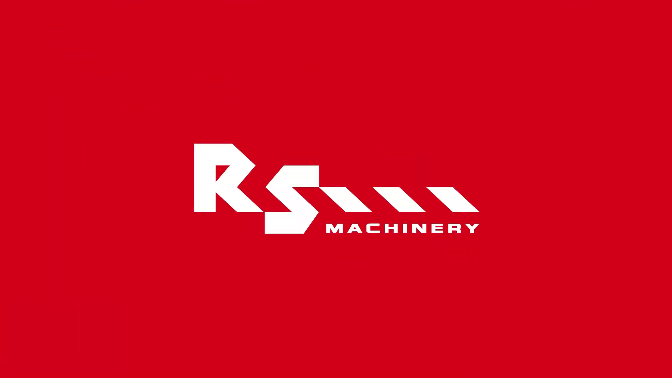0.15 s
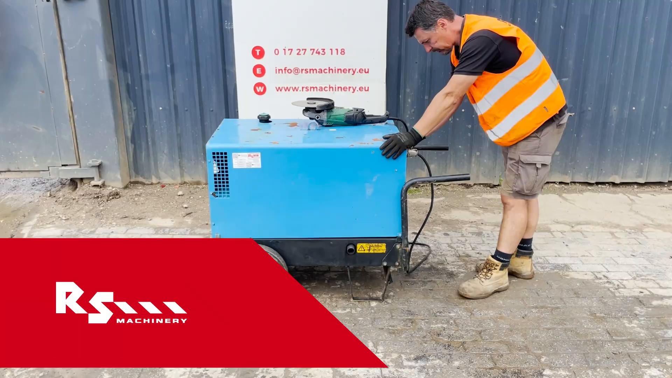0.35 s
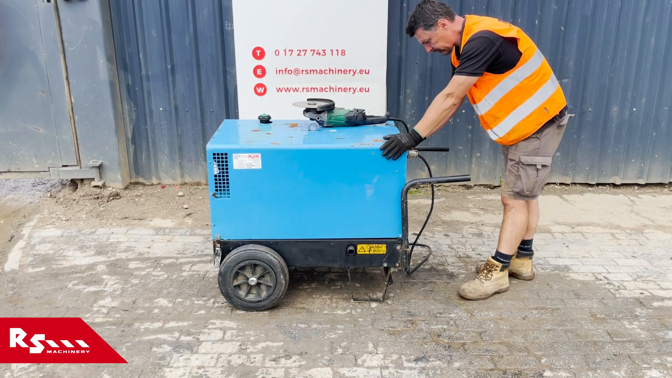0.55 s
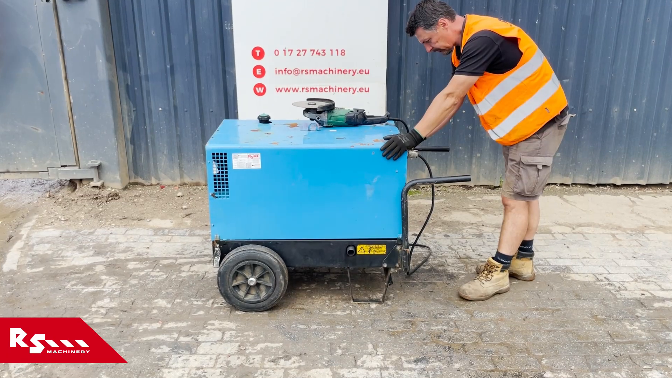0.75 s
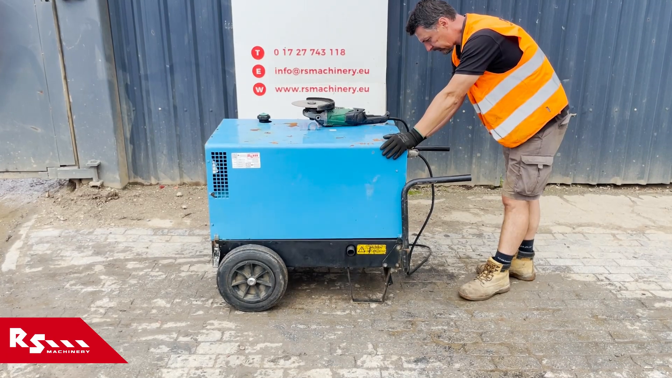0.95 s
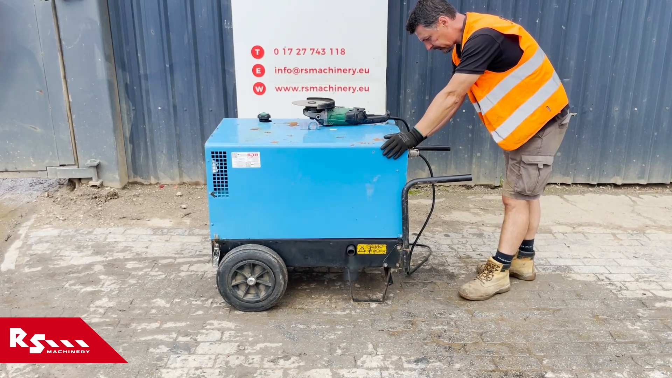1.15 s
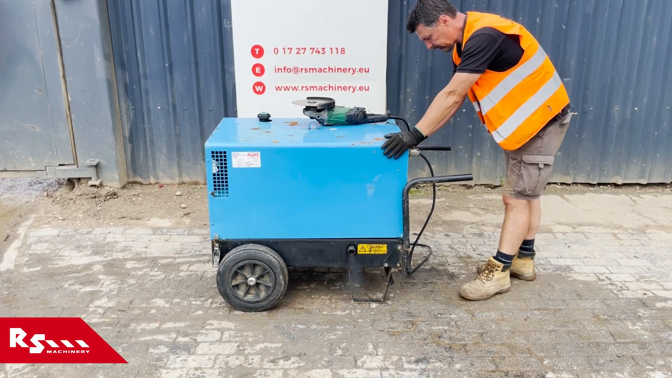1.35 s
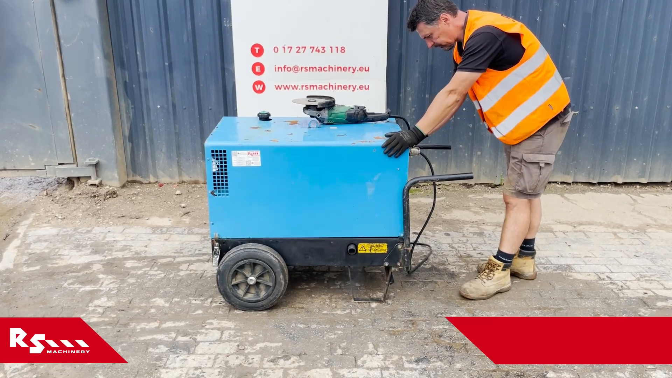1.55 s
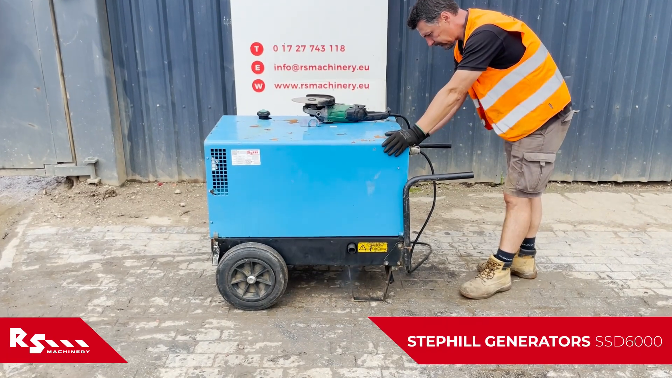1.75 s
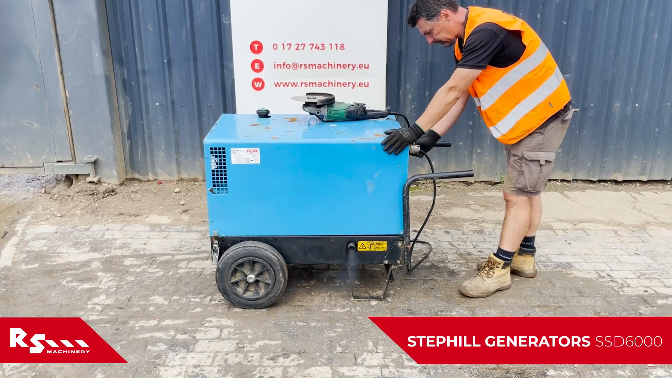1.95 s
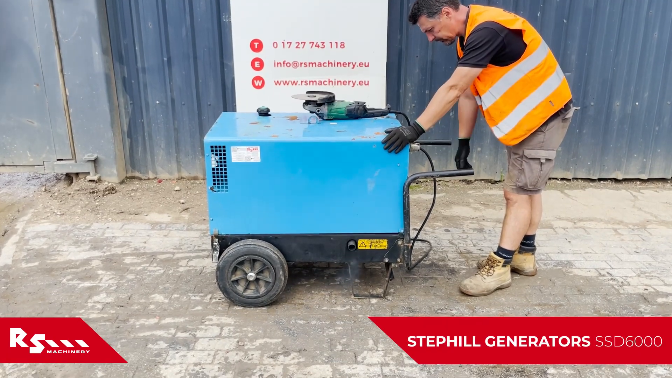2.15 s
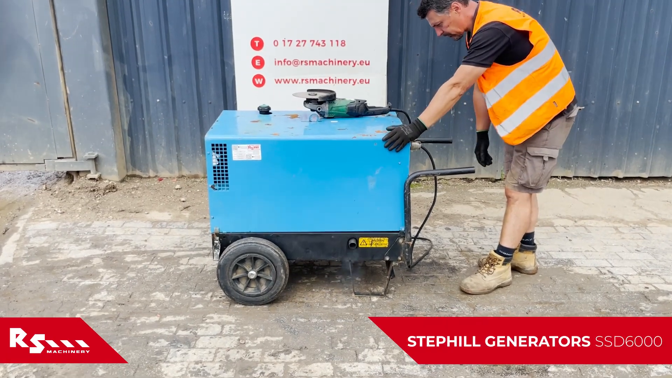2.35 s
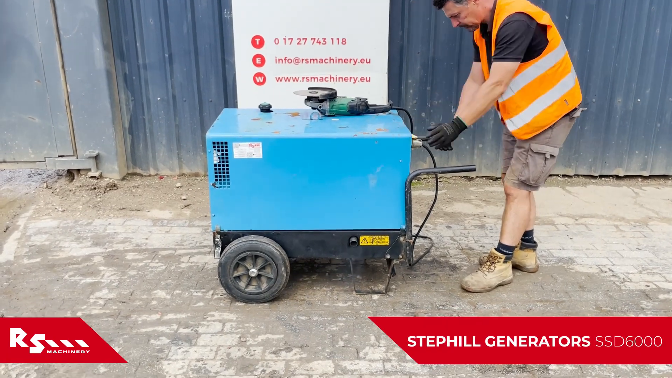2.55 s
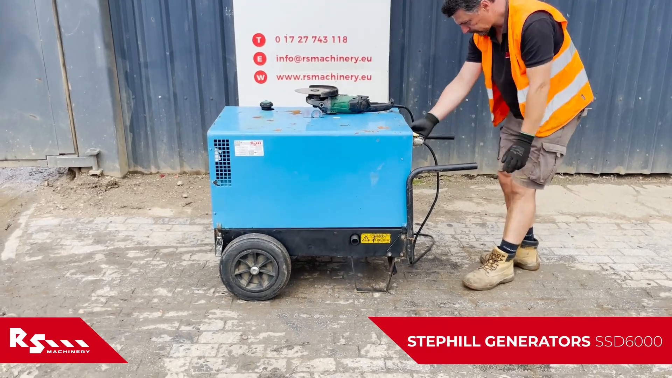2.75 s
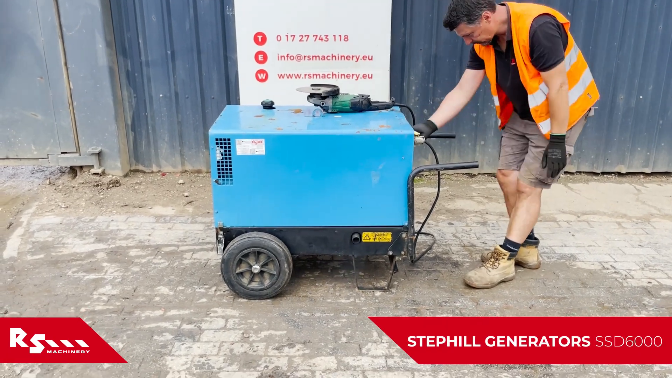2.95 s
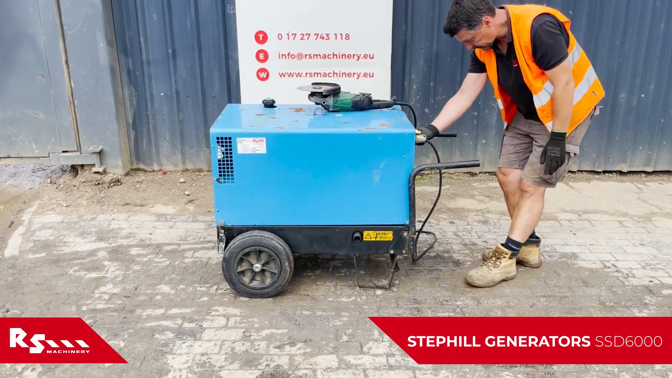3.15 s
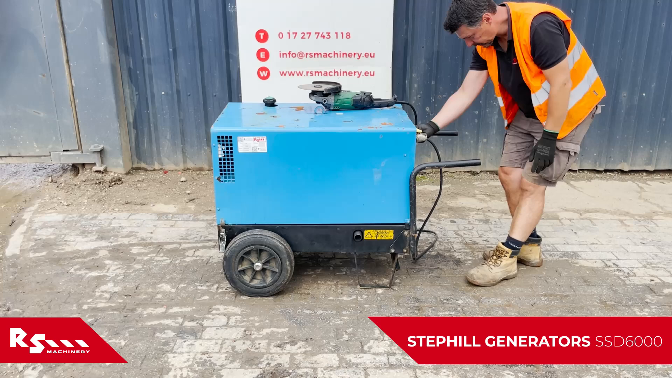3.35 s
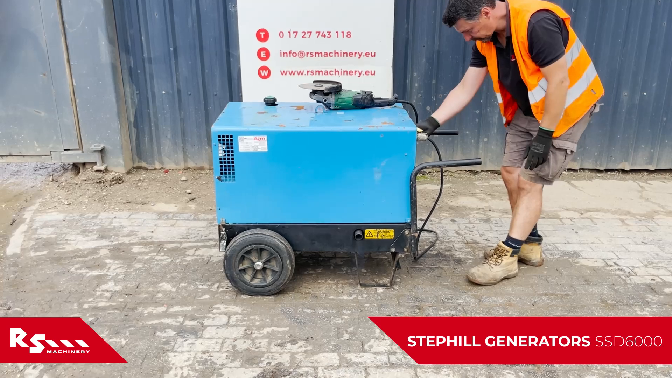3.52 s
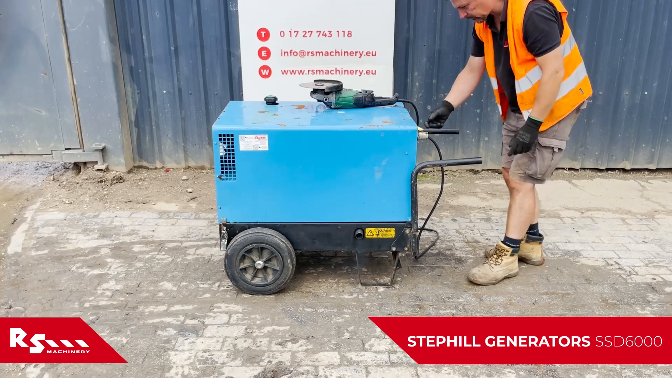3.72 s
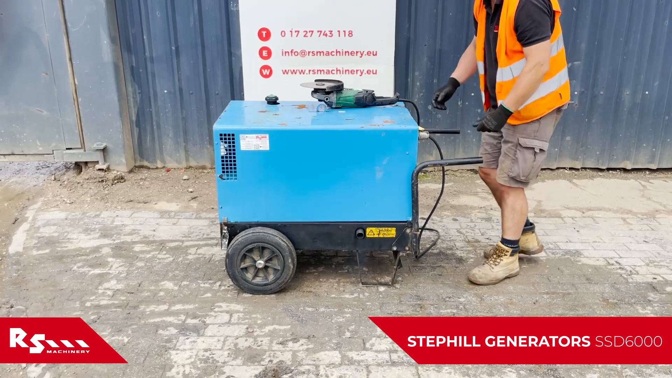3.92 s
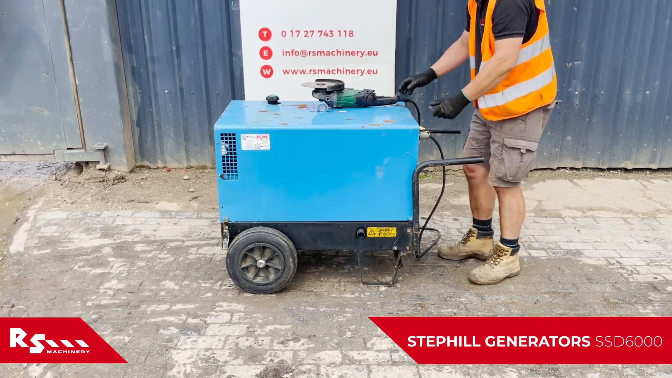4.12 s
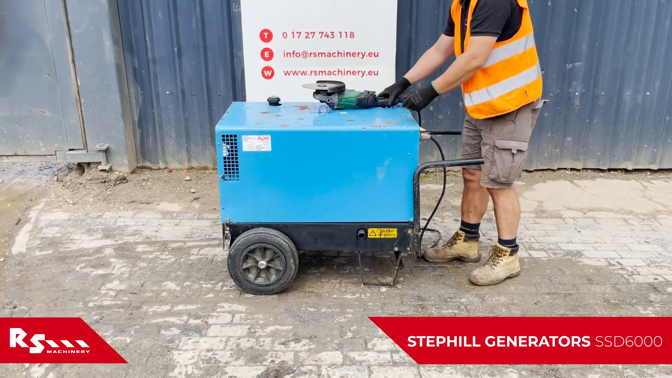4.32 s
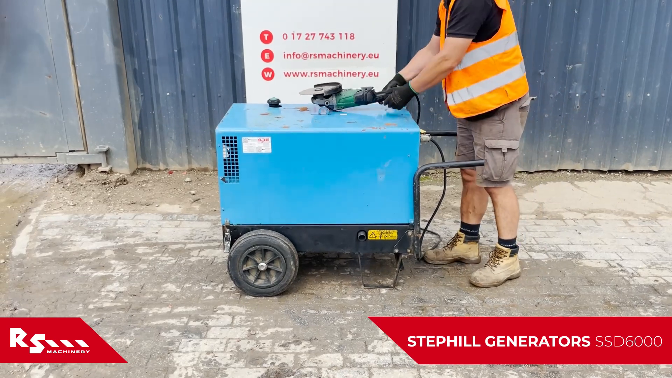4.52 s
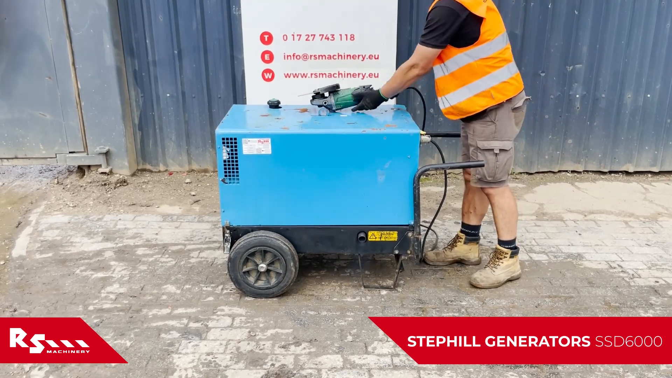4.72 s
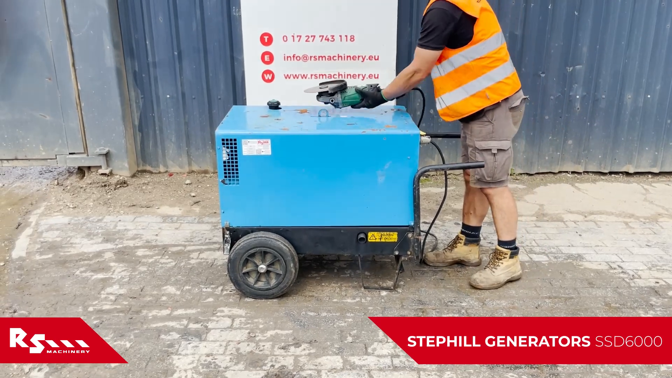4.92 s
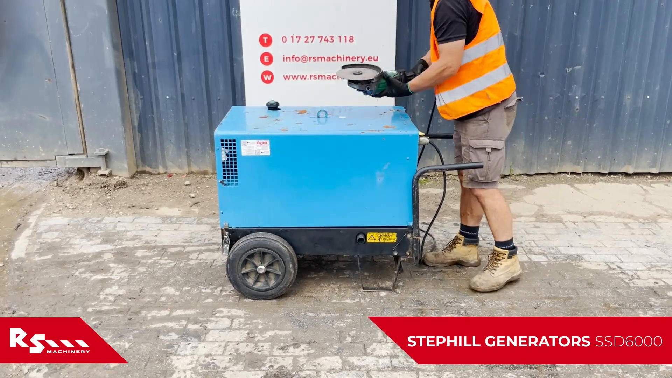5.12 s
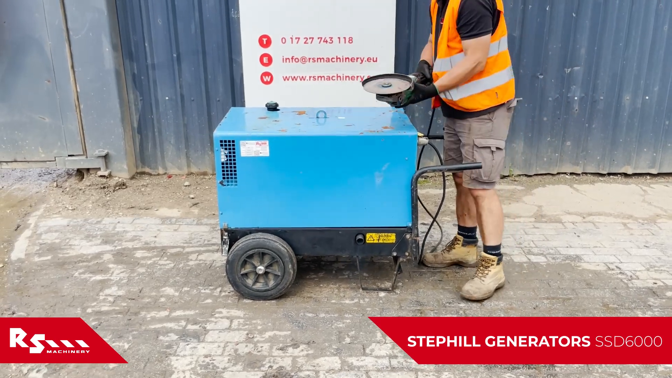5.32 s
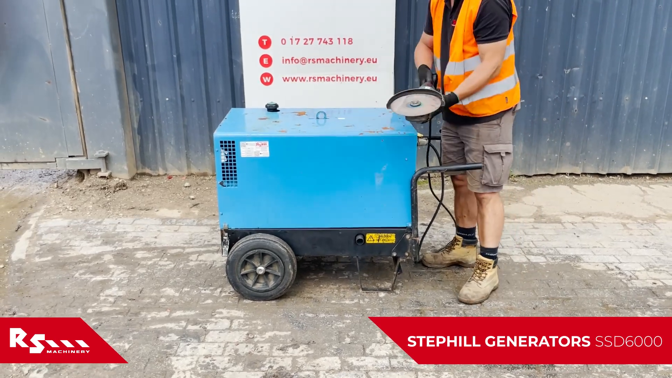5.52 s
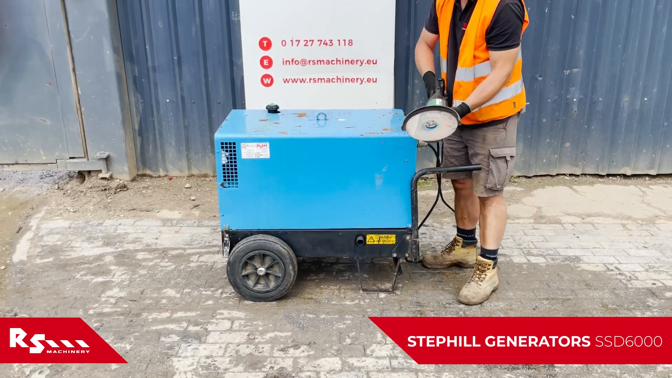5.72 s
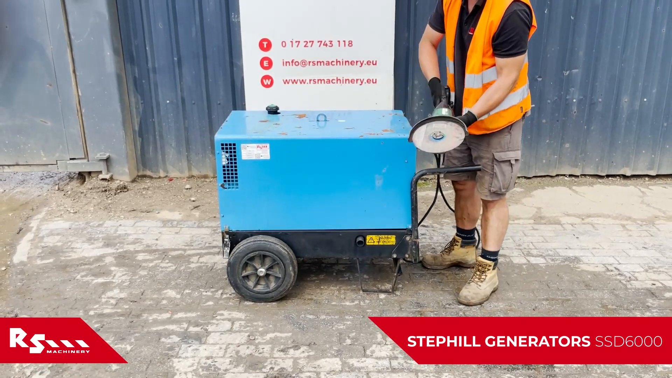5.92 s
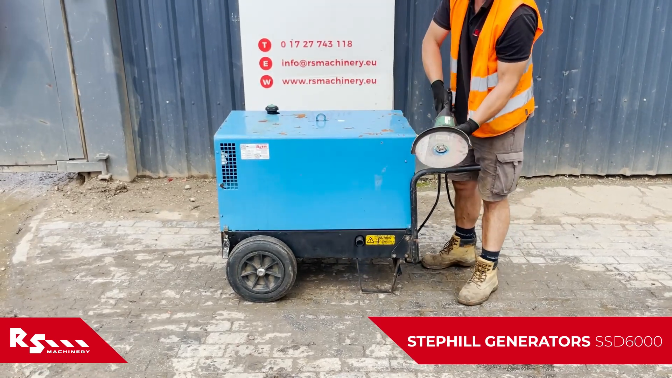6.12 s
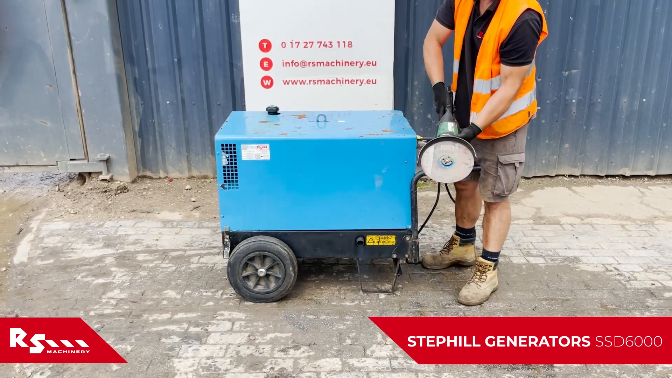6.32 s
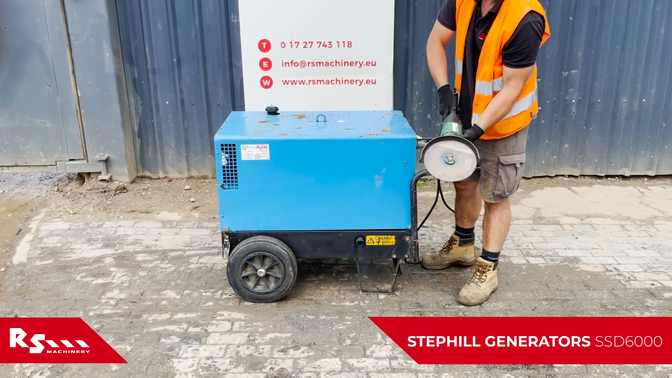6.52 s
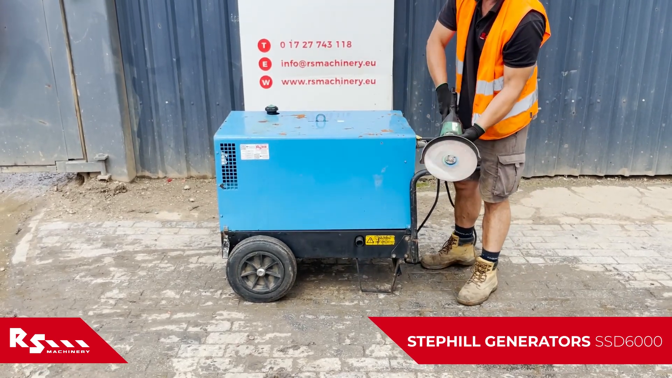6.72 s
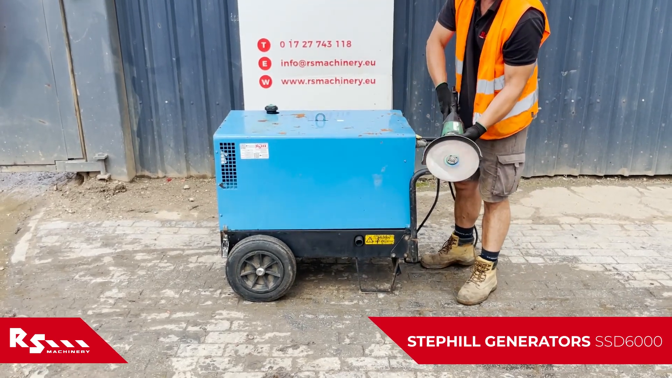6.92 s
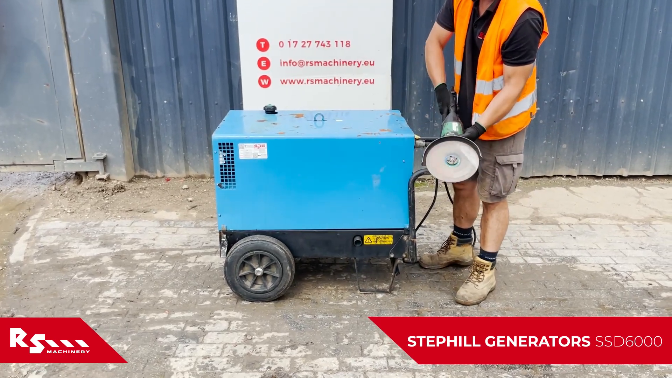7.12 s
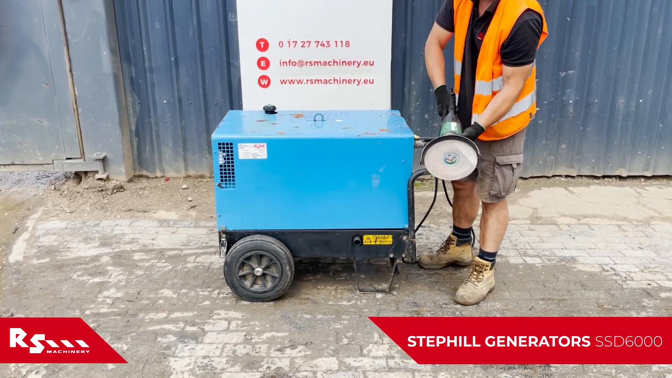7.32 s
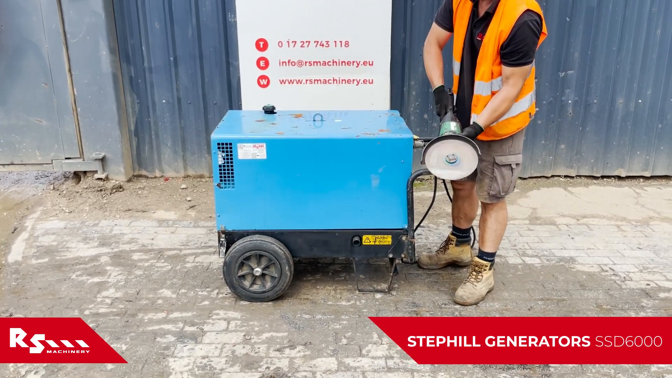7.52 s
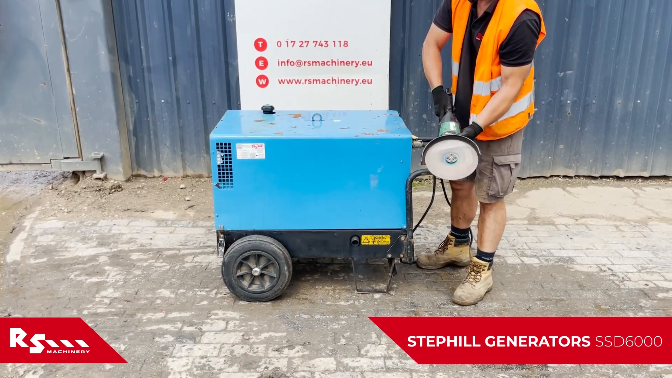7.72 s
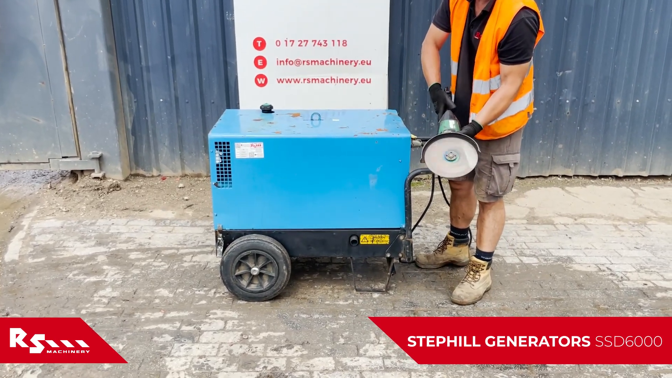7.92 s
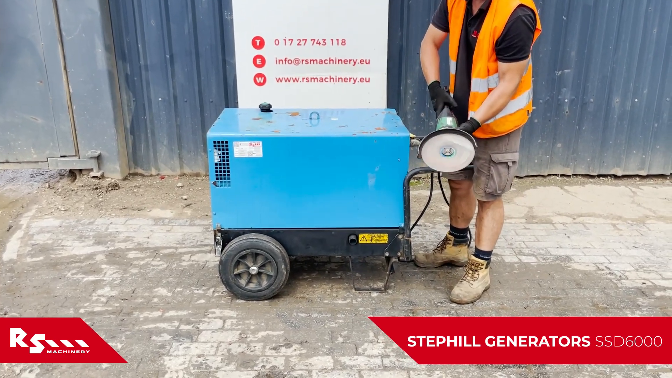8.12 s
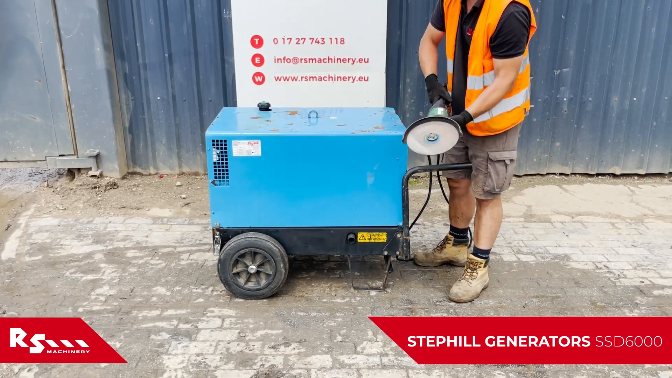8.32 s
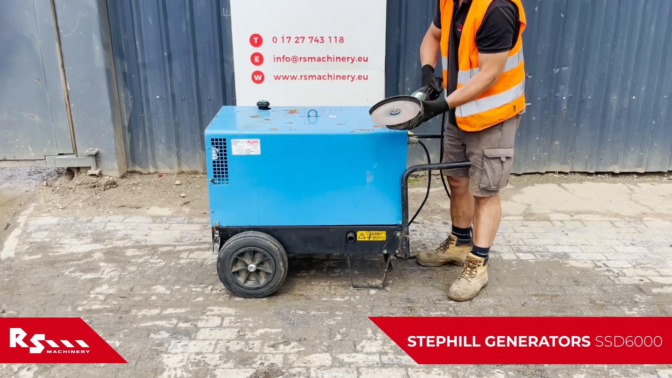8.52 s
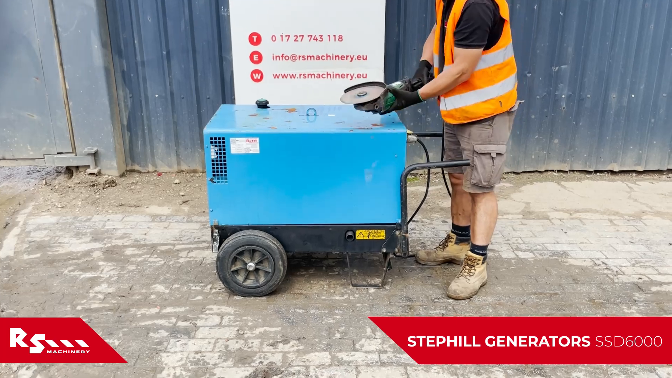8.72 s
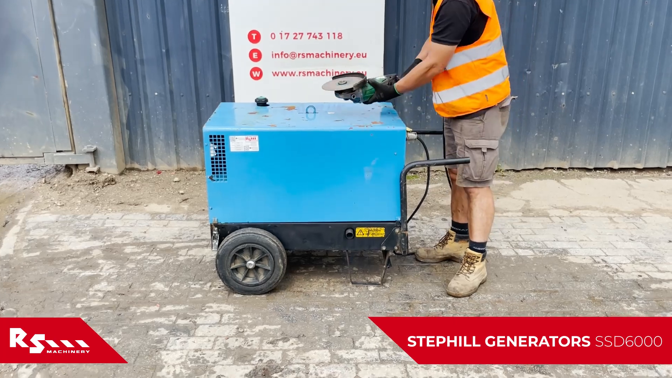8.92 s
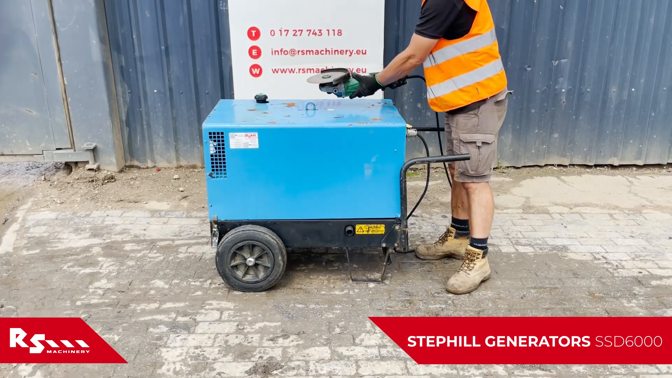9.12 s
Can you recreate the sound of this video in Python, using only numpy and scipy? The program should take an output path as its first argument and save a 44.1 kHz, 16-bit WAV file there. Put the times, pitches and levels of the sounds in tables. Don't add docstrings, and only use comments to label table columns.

```python
import sys
import numpy as np
from scipy import signal
from scipy.fft import rfft, irfft, next_fast_len
from scipy.io import wavfile
from scipy.ndimage import map_coordinates

SR = 44100
rng = np.random.default_rng(int(sys.argv[2]) if len(sys.argv) > 2 else 0)


def field_ratio(decibels):
    return 10 ** (np.asarray(decibels, dtype=float) / 20)


def store_wav(level_fs):
    pcm = np.round(np.clip(np.atleast_2d(level_fs), -1, 1) * 32767)
    wavfile.write(sys.argv[1], SR, pcm.T.astype(np.int16))


N = 403956

# time_s, firings_per_s
SPEED = [
    (.55, 9.01),
    (1.05, 12.763),
    (1.8, 21.294),
    (2.05, 23.516),
    (2.3, 24.025),
    (2.55, 25.222),
    (4.5, 25.288),
    (9.16, 25.611),
]
# on_s, off_s, engine_sag_firings_per_s
RUNS = [
    (6.428, 6.74, 1.296),
    (7.41, 7.81, .771),
]


def unit(x):
    return x / np.sqrt(np.mean(x ** 2) + 1e-20)


def along(points, hz):
    f, *cols = np.transpose(points)
    return np.squeeze([np.interp(np.log(hz + 1), np.log(f + 1), c) for c in cols])


def curves(rows):
    s, *cols = np.transpose(rows)
    return [np.interp(np.arange(N) / SR, s, c) for c in cols]


def since(s):
    return np.maximum(np.arange(N) / SR - s, 0)


def wobble(rate):
    step = np.arange(N // 32 + 2) * 32
    knots = rng.standard_normal(int(N * rate / SR) + 4)
    return np.interp(np.arange(N), step, map_coordinates(knots, [step * rate / SR]))


def filtered(x, response):
    m = next_fast_len(N + 8192)
    return irfft(rfft(x, m) * response(np.fft.rfftfreq(m, 1 / SR)), m)[..., :N]


def noise(spectrum):
    return unit(filtered(rng.standard_normal(N), lambda hz: field_ratio(along(spectrum, hz))))


def mode(hz, width):
    return lambda f: 1j * f * width / (hz * hz - f * f + 1j * f * width)


def modes(table):
    return lambda f: sum((-1) ** k * field_ratio(db) * mode(c, w)(f) for k, (c, w, db) in enumerate(table))


def tone(hz, level):
    level_db = along(level, hz) + 3.0 * wobble(25)
    turns = np.cumsum(hz + 12 * wobble(40)) / SR
    return field_ratio(level_db) * np.sqrt(2) * np.sin(2 * np.pi * turns)


def firing_rate():
    lag_s, sag_s, recover_s = .025, .118, .24
    rate = curves(SPEED)[0]
    for on, off, depth in RUNS:
        pulled = 1 - np.exp(-np.minimum(since(on + lag_s), off - on) / sag_s)
        rate = rate - depth * pulled * np.exp(-since(off + lag_s) / recover_s)
    return rate


def engine_levels(rate):
    # time_s, knock_db
    fuel = [
        (.5, -68),
        (.62, -48),
        (1, -47.5),
        (1.3, -41.5),
        (1.9, -40),
        (2.2, -37.5),
        (2.3, -46.5),
        (5, -44),
        (9.16, -42.5),
    ]
    knock_db = curves(fuel)[0]
    speed_db = 20 * np.log10(rate / SPEED[-1][1])
    roar_db = -32.5 + 0.42 * speed_db + 0.45 * np.maximum(knock_db - fuel[-2][1], -8)
    scrape_s, scrape_db, scrape_length_s = 5.58, 4, .05
    scrape = np.exp(-((np.arange(N) / SR - scrape_s) / scrape_length_s) ** 2)
    creep_db = 0.67 * since(2.8)
    fan_db = -45 + 0.54 * speed_db + creep_db + scrape_db * scrape
    catch_s, catch_db_per_s = 1.06, 63
    asleep_s = np.clip(catch_s - np.arange(N) / SR, 0, .45)
    boom_db = -1 + 0.48 * speed_db - catch_db_per_s * asleep_s
    return roar_db, knock_db, fan_db, boom_db


def exhaust(turns, rate):
    # multiple_of_firing_rate, rms_db
    orders = [(2, -25.5), (3, -14), (4, -39), (5, -40.5), (6, -31.5), (7, -31.5), (8, -37.5), (9, -36),
              (10, -40.5), (11, -46), (13, -45), (15, -46.5), (16, -49), (17, -48), (18, -44.5), (20, -46),
              (22, -42.5), (23, -50)]
    slow = np.clip(1 - rate / 24, 0, 1)
    lumpy_db = 20 + 8 * wobble(11.8)
    boom = 0
    for k, db in orders:
        slow_db = lumpy_db if 3 < k < 8 else -30 if k < 8 else -90
        level_db = db + (0.37 + 0.12 * k) * wobble(6) + slow * slow_db
        boom = boom + field_ratio(level_db) * np.sqrt(2) * np.cos(2 * np.pi * k * (turns - .06) + .3 * k * k)
    return boom


def roar_and_fan(turns, roar_db, fan_db):
    # hz, level_db
    roar = [(30, -23), (60, 0), (125, 1), (250, -2.5), (400, -15), (560, -13.5), (800, -11), (1150, -16),
            (2000, -45.5)]
    # hz, level_db
    panels = [(400, 0), (560, -3), (800, -1), (1150, -8), (1400, -12), (1700, -9), (2800, -11.5),
              (4200, -16), (5700, -22), (7000, -19.5), (9000, -23.5), (11500, -25.5), (14000, -73),
              (15800, -53)]
    throb = 1 + 0.23 * np.cos(2 * np.pi * (turns - .06)) + 0.39 * np.cos(6 * np.pi * (turns - .13))
    return field_ratio(roar_db) * throb * noise(roar) + field_ratio(fan_db + 8.5 + 0.99 * wobble(9)) * noise(panels)


def knocks(fired, luck):
    # hz, level_db
    knock_spectrum = [(500, -19), (1400, -5), (2800, 2), (4200, -2), (5700, -10.5), (7000, -5.5),
                      (9000, 0.5), (11500, -11.5), (14000, -20.5), (15800, -40)]
    span = np.arange(-512, 512)
    t = span / SR
    shape = np.exp(-(t / np.where(t < 0, .004, .0065)) ** 2)
    hz = np.fft.rfftfreq(len(t), 1 / SR)
    grid = np.meshgrid(np.arange(len(fired)), hz / 400, indexing="ij")
    colour = map_coordinates(luck[:, 6:], grid, order=1)
    burst = rfft(rng.standard_normal((len(fired), len(t))) * shape)
    burst = irfft(burst * field_ratio(along(knock_spectrum, hz) + 2.5 * colour))
    burst *= field_ratio(1.2 * luck[:, :1])
    at = np.clip(fired[:, None] + span, 0, N - 1)
    return unit(np.bincount(at.ravel(), burst.ravel(), N))


def cover_rings(fired, luck, knock_db, boom_db):
    # hz, width_hz, level_db, lead_s
    cover = [
        (1405, 30, -44, 0),
        (558, 30, -44, 0),
        (2850, 110, -54, 0),
        (3650, 130, -56, .007),
        (4800, 130, -55, .008),
    ]
    blows = np.zeros((len(cover), N))
    blows[:, fired] = field_ratio(2.8 * luck[:, 1:1 + len(cover)].T)
    warm_db = np.minimum(np.arange(N) / SR - 5.6, 0)
    blows[0] = (blows[0] + .01 * rng.standard_normal(N)) * field_ratio(warm_db)
    rings = 0
    for blow, (c, w, db, lead) in zip(blows, cover):
        ring = filtered(blow, lambda f: mode(c, w)(f) * mode(c, 6 * w)(f) * np.exp(2j * np.pi * f * lead))
        rings = rings + field_ratio(db) * unit(ring) * (field_ratio(knock_db + 43.0) if lead else field_ratio(boom_db))
    return rings


def engine():
    rate = firing_rate()
    turns = .172 + np.cumsum(rate) / SR
    roar_db, knock_db, fan_db, boom_db = engine_levels(rate)
    fired = np.flatnonzero(np.diff(np.floor(turns)))
    luck = rng.standard_normal((len(fired), 62))
    boom = field_ratio(boom_db) * exhaust(turns, rate)
    rings = cover_rings(fired, luck, knock_db, boom_db)
    return boom + rings + roar_and_fan(turns, roar_db, fan_db) + field_ratio(knock_db + 1.5) * knocks(fired, luck)


def compression_puffs():
    # start_s, peak_db, length_s
    crank = [
        (0.041, -34, 0.048),
        (0.199, -32, 0.028),
        (0.243, -32, 0.044),
        (0.337, -32, 0.03),
        (0.398, -34, 0.039),
        (0.476, -36, 0.035),
        (0.515, -35.5, 0.024),
    ]
    # hz, level_db
    puff_spectrum = [(60, 5.5), (200, 2), (400, -30), (700, -5.5), (1100, -22), (1500, -19.5),
                     (2200, -23.5), (4200, -25), (5700, -34), (8500, -19.5), (11500, -32.4), (14000, -68),
                     (15800, -62)]
    t = np.arange(N) / SR
    push = sum(field_ratio(db) * np.exp(-np.abs((t - s - length / 2) / (length / 2)) ** 2)
               for s, db, length in crank)
    return field_ratio(6.0 + 2.5 * wobble(250)) * push * noise(puff_spectrum)


def starter_motor():
    t = np.arange(N) / SR
    rate = firing_rate()
    release_s, let_go_s = 1.63, .1
    fade_db = -25 * since(release_s - let_go_s) / let_go_s
    peak_rate, peak_db, width = 13.5, 18.7, 4
    off_peak = (rate - peak_rate) / np.where(rate < peak_rate, width / 2, 2 * width)
    tone_db = -63 + peak_db * np.exp(-np.abs(off_peak) ** 2) + fade_db
    brush_db = -65 + (rate - rate[0]) + fade_db
    rumble_db = -48.5 + fade_db
    pinion = field_ratio(tone_db + 2 * wobble(11.5)) * np.sqrt(2) * np.sin(2 * np.pi * 399 * t)
    hiss = field_ratio(brush_db) * noise([(10500, -40), (11700, 0), (12300, 0), (13300, -60)])
    rumble = field_ratio(rumble_db + 19 + 8.7 * wobble(14.2)) * noise(
        [(30, -29), (60, 5), (95, 14.0), (150, 4), (300, -38.0), (3000, -55), (9000, -85)])
    return (t < release_s) * (pinion + hiss + rumble)


def spin():
    spin_up_s, coast_s = .236, 4.95
    speed, power = np.zeros(N), np.zeros(N)
    for on, off, _ in RUNS:
        start = speed[round(on * SR)]
        climb = 1 - (1 - start) * np.exp(-np.minimum(since(on), off - on) / spin_up_s)
        speed = np.where(since(on) > 0, climb * np.exp(-since(off) / coast_s), speed)
        power = power + (since(on) > 0) * field_ratio(-600 * since(off - .015))
    return speed, power


def grinder_gain(speed, power, free_db, free_power, pull_db, pull_power):
    away = field_ratio(-6 * since(8.85))
    free = field_ratio(free_db) * speed ** free_power
    return away * np.hypot(free, field_ratio(pull_db) * power * (1 - speed) ** pull_power)


def start_jolts():
    jolt_db = [
        -17.5,
        -31.5,
    ]
    attack_s, hold_s, release_db_per_s = 0.027, 0.059, 210
    t = np.arange(N) / SR
    return sum((t > on) * field_ratio(db - release_db_per_s * since(on + attack_s + hold_s))
               * np.clip(0.37 + since(on) / attack_s, 0, 1) for (on, _, _), db in zip(RUNS, jolt_db))


def casing_and_guard(speed, power):
    # hz, width_hz, level_db
    casing_modes = [(1402, 55, -3.5), (1503, 70, -2.5), (1938, 99, -7)]
    # hz, level_db
    jolt_spectrum = [(400, -17), (600, -17), (830, 3), (1050, -8), (1300, 5), (1900, -3), (2300, -7),
                     (4000, -16), (5500, -40), (8000, -70)]
    guard_hz, guard_width_hz = 609, 22
    shake = np.hypot(grinder_gain(speed, power, -29.5, 2, -31, .9), start_jolts())
    rattle = field_ratio(1.2 * wobble(90)) * rng.standard_normal(N)
    casing = unit(filtered(rattle, lambda f: modes(casing_modes)(f) / (1 + (f / 8000) ** 2)))
    guard = unit(filtered(rattle, mode(guard_hz, guard_width_hz))) + 1.15 * noise(jolt_spectrum)
    return field_ratio(-1.5) * shake * field_ratio(1.34 * wobble(22)) * casing + field_ratio(8.5) * shake ** 1.726 * guard


def gear_noise(speed, power, torque):
    # hz, level_db
    gear_spectrum = [(400, -24), (1000, -3.5), (2200, -5), (3000, -2), (4000, -0.5), (5000, -5),
                     (5800, -20.5), (7000, -10.5), (10000, -80), (14000, -60)]
    gears = unit((12.0 + power * torque) * noise(gear_spectrum))
    return field_ratio(-1.0) * grinder_gain(speed, power, -23.5, 2.5, -25.5, 0.5) * gears


def housing_chatter(speed, power, torque):
    # start_s, drop_below_centre_hz, climb_s, bite_db
    starts = [
        (6.428, 330, .9, 0),
        (7.41, 400, .14, 3),
    ]
    # hz, width_hz, level_db
    housing = [(3400, 70, -5), (3580, 60, 0), (3850, 60, -2), (4180, 60, 1), (4320, 60, 1), (4700, 80, -5)]
    t = np.arange(N) / SR
    hz = 4200 - sum(drop_hz * (t > s) * np.exp(-since(s) / climb) for s, drop_hz, climb, _ in starts)
    bite = field_ratio(sum(db * (t > s) for s, _, _, db in starts) * power)
    rough = map_coordinates(rng.standard_normal(N // 45 + 4), [np.arange(N) / 45])
    chatter = unit(torque * rough) * np.sin(2 * np.pi * np.cumsum(hz) / SR)
    gain = grinder_gain(speed, power, -29, 6, -24, .3)
    return field_ratio(5) * filtered(chatter * bite * gain, modes(housing))


def disc_wind(speed, power):
    # hz, level_db
    disc = [(3000, -16.5), (5800, -14.5), (7000, -8.5), (8800, 0.5), (11000, -8.5), (13000, -19.5),
            (15800, -29)]
    gain = grinder_gain(speed, power, -36.5, 3.5, -50, 0.9)
    return gain * field_ratio(13.0 + 1.1 * wobble(30)) * noise(disc)


def whines(speed, power):
    # pitch_hz, rms_db
    whine_db = [(6500, -75), (7100, -43), (8100, -42), (8600, -31), (9100, -37), (10200, -35)]
    # pitch_hz, rms_db
    mesh_db = [(4050, -70), (4200, -47), (4360, -40), (4460, -46), (4600, -75)]
    top_hz, mesh_ratio = 10800, .596
    mesh = tone(mesh_ratio * top_hz * speed, mesh_db)
    return field_ratio(-4 * power) * tone(top_hz * speed, whine_db) + (power < .01) * mesh


def bearing_cheeps():
    # time_s, pitch_hz, peak_db
    cheeps = [
        (7.025, 8900, -29),
        (7.11, 9000, -31),
        (7.165, 9500, -35),
        (7.31, 9200, -32),
        (7.385, 9000, -30),
    ]
    out = 0
    for s, pitch_hz, db in cheeps:
        t = np.arange(N) / SR - s
        out = out + field_ratio(db) * np.exp(-(t / 0.009) ** 2) * np.sin(2 * np.pi * t * (pitch_hz - 25000 * t))
    return out


def grinder():
    speed, power = spin()
    mains_turns = 4 * np.cumsum(firing_rate()) / SR
    torque = np.exp(1.7 * np.cos(2 * np.pi * mains_turns))
    body = casing_and_guard(speed, power) + gear_noise(speed, power, torque)
    air = disc_wind(speed, power) + whines(speed, power) + bearing_cheeps()
    started = np.arange(N) / SR > RUNS[0][0]
    return started * (body + housing_chatter(speed, power, torque) + air)


def gusts():
    # time_s, peak_db, length_s
    thuds = [
        (8.4, -22, .06),
        (8.9, -27, .06),
        (9.14, -24, .05),
        (1.61, -27, .05),
        (7.36, -28, .07),
    ]
    t = np.arange(N) / SR
    swell = sum(field_ratio(db) * np.exp(-((t - s) / length) ** 2) for s, db, length in thuds)
    return swell * noise([(30, -14), (100, 10.0), (220, -1.5), (400, -40), (2000, -90)])


def far_machine():
    # pitch_hz, rms_db
    partials = [(60.5, -21.5), (121, -29.5), (181.5, -37), (242, -41.5), (302, -51.5)]
    # time_s, level_db
    hum_level = [
        (0, 2),
        (.25, -7),
        (.85, -8),
        (1, 2.5),
        (1.9, 0.5),
        (9.16, -6),
    ]
    t = np.arange(N) / SR
    drift_s = np.cumsum(wobble(1.515)) / SR * 0.00288
    hum = sum(field_ratio(db + 3 * wobble(6)) * np.sqrt(2) * np.sin(2 * np.pi * hz * (t + drift_s))
              for hz, db in partials)
    return field_ratio(curves(hum_level)[0]) * hum


def scene():
    direct = engine() + compression_puffs() + starter_motor() + grinder() + gusts() + far_machine()
    t = np.arange(SR // 3) / SR
    walls = rng.standard_normal(len(t)) * field_ratio(-60 * t / .4)
    return np.array([direct, signal.fftconvolve(direct, walls / np.linalg.norm(walls))[:N]])


def top_cut(x):
    return signal.sosfilt(signal.butter(12, 15830, fs=SR, output="sos"), x)


def record(dry):
    # hz, left_lead_rad, left_minus_right_db, likeness
    port_table = [(250, -.9, 0, 1), (330, .3, -1.5, .9), (590, .3, -7, .9), (670, 2, -7, .85),
                  (820, 1.6, 2.5, .9), (1150, 1.1, -1, .8), (1400, .3, 3.5, .8), (2050, .3, -1, .6),
                  (2800, .8, 3.5, .72), (5200, .85, 3, .82), (5900, -1.3, -2, .6), (7000, -1.9, 3.5, .85),
                  (8300, -3.1, 0, 1), (8900, -3.2, 0, 1), (10500, -4.3, 0, .8), (12700, -6.2, 0, .52)]

    def ports(hz):
        lead, balance_db, alike = along(port_table, hz)
        half = field_ratio(balance_db / 2) * np.exp(.5j * lead)
        turn = np.arccos(np.clip(alike, 0, 1)) / 2
        left = [half * np.cos(turn), half * np.sin(turn)]
        right = [np.cos(turn) / half, -np.sin(turn) / half]
        return np.array([left, right])

    pair = filtered(dry, ports).sum(axis=1)
    bass = filtered(pair, lambda hz: 1 / (1 + (hz / 400) ** 4))
    deep = filtered(pair, lambda hz: 1 / (1 + (hz / 75) ** 4))
    shut_db, opens_s, opened_db, settled_db, settle_s = -16, 1.907, -7, 1.5, 2.12
    opening = np.clip(since(opens_s - .017) / .035, 0, 1)
    settling_db = (opened_db - settled_db) * np.exp(-since(opens_s) / settle_s)
    cut_db = shut_db + opening * (settled_db - shut_db + settling_db)
    pair = pair + (field_ratio(cut_db) - 1) * (bass - deep) + (field_ratio(1.24 * cut_db) - 1) * deep
    pair = filtered(np.tanh(pair / 1.344) * 1.445, lambda hz: hz < 15830)
    return top_cut(pair)


dry = scene()
out = record(dry)
store_wav(out)
```